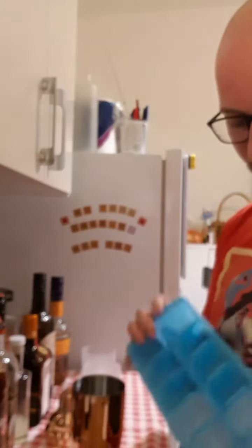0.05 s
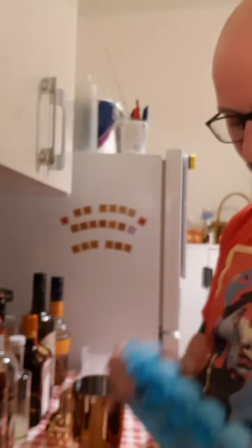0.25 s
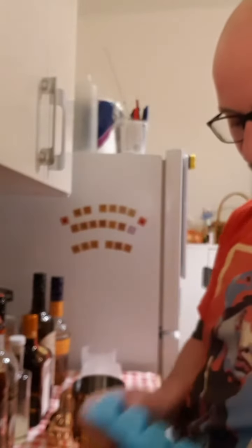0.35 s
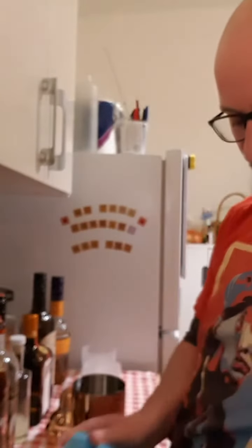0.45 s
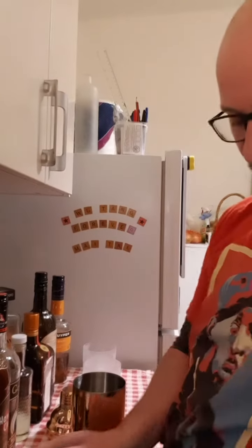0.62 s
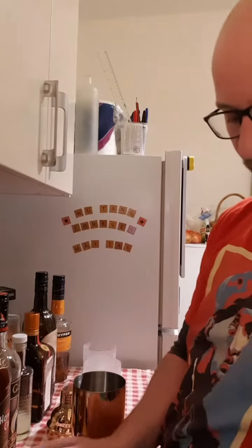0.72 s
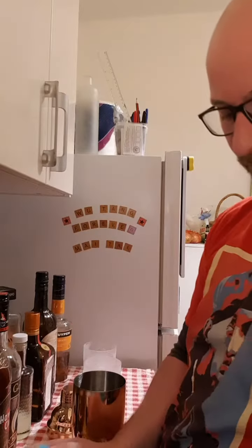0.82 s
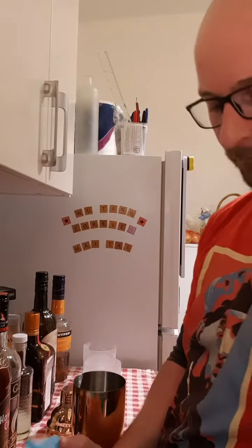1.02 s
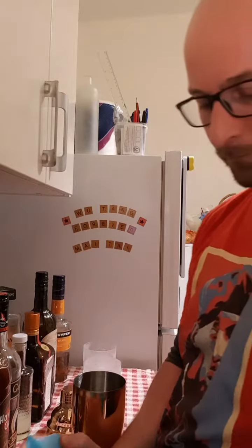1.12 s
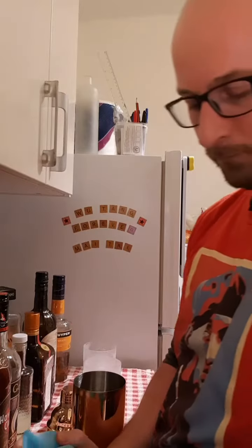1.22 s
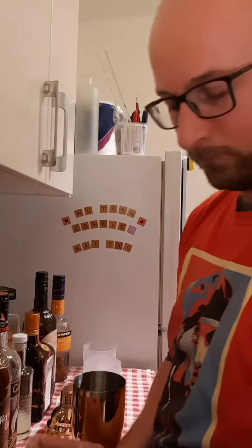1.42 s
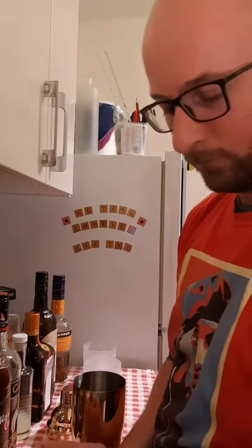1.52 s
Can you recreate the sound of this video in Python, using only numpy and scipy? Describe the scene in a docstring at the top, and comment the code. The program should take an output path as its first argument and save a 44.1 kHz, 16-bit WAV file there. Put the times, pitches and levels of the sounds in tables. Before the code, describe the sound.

Ice cubes slide and clatter in a plastic tray as it lands on a kitchen counter. A brighter crunch follows as the tray is flexed, then single cubes click, close by in a small, hard room.

```python
"""Ice cubes slide in a plastic tray and swell into a clatter as it is swung down onto a kitchen counter.
A brighter crunch follows as the tray is flexed, then single cubes click as they settle.
The crunch is a dense run of tiny slips of ice on plastic; each click is a snap, a knock and a short ring.
Three soft low thumps sit underneath. Counter and cupboards answer at once; the small hard room rings on."""
import sys
import numpy as np
from scipy import signal
from scipy.fft import rfft, irfft, next_fast_len
from scipy.io import wavfile

SR = 44100
rng = np.random.default_rng(int(sys.argv[2]) if len(sys.argv) > 2 else 0)


def persist_wave(psi):
    """Save psi, clipped to +-1, as 16-bit WAV."""
    counts = np.round(np.clip(psi, -1, 1) * 32767).astype(np.int16)
    wavfile.write(sys.argv[1], SR, np.atleast_2d(counts).T)


N = 68355

# The swing and landing. Each row: time in seconds, relative levels of slide and low tray body in dB.
SLIDE_FADERS = [(0, -42, -56), (.03, -43.5, -59), (.07, -56, -93), (.11, -48.5, -61), (.135, -42.5, -60.5),
                (.185, -46, -55), (.21, -31.5, -58.5), (.235, -34.5, -71), (.255, -26.5, -55),
                (.28, -25, -49), (.305, -25, -39), (.335, -27.5, -33.5), (.36, -22.5, -41.5),
                (.4, -23, -49), (.425, -22, -31), (.445, -24, -35), (.468, -36, -40), (.485, -30, -35),
                (.52, -63, -42.5), (.59, -41, -56.5), (.69, -52, -68)]
# The flexed tray grinds on ice and rubs on hand and counter. Each row: time in seconds, relative level in dB.
GRIND_FADER = [(.56, -55), (.6, -44), (.63, -46.5), (.688, -43), (.7, -32), (.715, -32.5), (.728, -27.5),
               (.765, -28.5), (.8, -27.5), (.82, -31), (.835, -43), (.885, -43), (.912, -28), (.935, -55)]
RUB_FADER = [(.66, -49), (.82, -41.5), (.885, -38), (.92, -36.5), (.945, -42.5), (1.005, -33),
             (1.06, -46.5), (1.12, -41.5), (1.16, -55), (1.25, -55), (1.29, -43), (1.37, -49),
             (1.44, -61.5), (1.54, -78)]
# The colour of each friction layer. Each row: frequency in Hz, relative level in dB.
SLIDE_EQ = [(200, -30), (550, -23), (800, -9.5), (1050, -15), (1300, -1.5), (1600, 1), (2100, 3),
            (2900, -0.5), (4600, -1), (6800, 0.5), (8500, -7.5), (10500, -6), (13200, -6.5), (15800, -18)]
BODY_EQ = [(40, -19), (90, -4), (170, -2), (260, -11), (350, -1), (550, 1.5), (780, 1.5), (1040, 10.5),
           (1350, 0.5), (1700, -12), (4000, -22)]
GRIND_EQ = [(200, -42), (900, -11), (1700, -9.5), (2400, 3.5), (3300, -2), (4600, -0.5), (5600, -5.5),
            (6100, 2), (6600, 1), (7300, -6), (8200, -6.5), (9700, -11), (12000, -3.5), (15800, -14.5)]
RUB_EQ = [(100, -21), (280, -21.5), (400, -10.5), (520, -7.5), (760, 2), (1000, -14), (1250, -1),
          (2200, -0.5), (3300, -4), (4500, -5), (6700, -6), (8500, -14), (12500, -10.5), (15800, -24)]

def crunch():
    """Ice slides and grinds in the tray, and the tray rubs on hand and counter."""
    slide, body = gains(SLIDE_FADERS)
    grind, rub = gains(GRIND_FADER)[0], gains(RUB_FADER)[0]
    layers = [(slide, SLIDE_EQ), (body, BODY_EQ), (grind, GRIND_EQ), (rub, RUB_EQ)]
    return sum(coloured(level * slips(friction_share=.32), eq) for level, eq in layers)


def slips(friction_share, per_second=2200, scatter_db=4):
    """Stick-slip grit: tiny impulses of uneven size over a hiss of smooth friction."""
    sizes = amp(scatter_db * np.minimum(rng.exponential(size=N), 3)) * rng.choice([-1, 1], N)
    grit = sizes * (rng.random(N) < per_second / SR)
    grit /= np.sqrt(np.mean(grit ** 2) + 1e-20)
    return np.sqrt(1 - friction_share) * grit + np.sqrt(friction_share) * rng.standard_normal(N)


# Single cube hits. Each row: start in seconds, snap in dB, knock in dB, their shared t60 in seconds,
# ring pitch in Hz, ring in dB. Levels are relative.
CUBE_HITS = [(0.02, -39, -52, 0.027, 1470, -63.5), (0.085, -42.5, -74, 0.043, 5770, -38),
             (0.107, -29.5, -43, 0.017, 5350, -37), (.130, -51, -48, .06, 800, -40),
             (0.2031, -28.5, -31, 0.03, 1300, -33), (.208, -39, -35, .03, 2394, -18.5),
             (0.2465, -35, -46, .04, 1624, -19), (.309, -18.5, -24, 0.053, 1640, -35),
             (0.3256, -17, -21.5, 0.039, 876, -13), (.356, -26, -30, 0.037, 2000, -40),
             (0.4344, -15.5, -23, 0.058, 1400, -21), (.441, -26.5, -22, 0.034, 2930, -28),
             (0.4476, -15.5, -19.5, 0.051, 3876, -16), (0.466, -17, -35, 0.024, 1060, -26),
             (0.597, -33.5, -54, 0.033, 4660, -46), (.654, -40, -72, 0.027, 4620, -48),
             (0.6966, -29.5, -56, 0.024, 4680, -23), (0.7224, -28, -42, 0.027, 5340, -30),
             (0.7477, -24, -38, 0.028, 5510, -16), (0.772, -26, -65, 0.033, 6550, -27),
             (.795, -32, -64, 0.025, 6460, -13.5), (0.813, -27, -35, 0.041, 2430, -28),
             (.925, -44, -29, 0.021, 1630, -21), (.968, -35, -37, 0.053, 666, -28.5),
             (1.033, -44, -43, 0.047, 1250, -34), (1.064, -33.5, -44, 0.015, 713, -30),
             (1.1022, -36.5, -31, 0.033, 628, -22.5), (1.137, -28, -37, 0.016, 4170, -34),
             (1.222, -42, -55, 0.034, 4080, -48), (1.2282, -28, -35.5, 0.021, 4170, -36),
             (1.266, -50, -47, 0.045, 714, -38), (1.2735, -32.5, -44, 0.028, 676, -32.5),
             (1.3145, -38, -43, .04, 736, -34), (1.3391, -36.5, -55, 0.055, 2250, -34),
             (1.3513, -34, -42, 0.033, 6770, -28), (1.3638, -27.5, -49, 0.026, 7000, -30),
             (1.4203, -31.5, -44, 0.031, 2113, -31), (1.427, -42.5, -69, 0.05, 1284, -33),
             (1.4907, -33.5, -67, 0.027, 4226, -32.5)]
# The colour of ice snap and plastic knock. Each row: frequency in Hz, relative level in dB.
SNAP_EQ = [(200, -39), (900, -15.5), (2000, 0), (3200, -0.5), (4200, 1.5), (5500, -1.5), (6900, 1),
           (8500, -6.5), (10500, -6), (13000, -5), (15800, -15.5)]
KNOCK_EQ = [(60, -18), (280, -22), (400, -17), (560, -4.5), (760, -1.5), (1000, -4), (1400, -1.5),
            (2100, 1.5), (3200, 0.5), (6000, -36.5), (15000, -15)]

def cube_clicks(attack_s=.0026, ring_t60_s=.02, ring_width_hz=90, low_cut_hz=403):
    """Cubes crack loose and hit the tray: a bright snap of ice, a hollow knock and a pitched ring."""
    snap_level, knock_level, ring = np.zeros((3, N))
    phase_drift = np.cumsum(rng.standard_normal(N)) * np.sqrt(2 * np.pi * ring_width_hz / SR)
    for start, snap_db, knock_db, t60, pitch, ring_db in CUBE_HITS:
        t = np.maximum(np.arange(N) / SR - start, 0)
        attack = 1 - np.exp(-t / attack_s)  # a contact builds up over a few small slips
        burst = attack * decay(t, t60)
        snap_level += amp(snap_db) * burst
        knock_level += amp(knock_db) * burst
        ring += amp(ring_db) * attack * decay(t, ring_t60_s) * np.sin(2 * np.pi * pitch * t + phase_drift)
    # the rings carry nothing below about 400 Hz
    ring = filtered(ring, lambda hz: (1j * hz / (low_cut_hz + 1j * hz)) ** 2
                    / np.sqrt(1 + (low_cut_hz / (hz + 1)) ** 8))
    snap = coloured(snap_level * slips(friction_share=.7), SNAP_EQ)
    knock = coloured(knock_level * rng.standard_normal(N), KNOCK_EQ)
    return 2 * (snap + knock + ring)


# The tray's resonances. Each row: centre in Hz, width in Hz, level against the input in dB.
TRAY_RESONANCES = [(1096, 155, -12), (1194, 76, -0.5), (1606, 65, -1), (1960, 280, -7), (4504, 81, -7),
                   (5430, 130, -10.5), (6830, 200, -21)]

def tray_ring(x):
    """The loaded tray adds a brief ring at each of its modes."""
    return filtered(x, lambda f: 1 + sum(amp(db) * 1j * f * width / (hz * hz - f * f + 1j * f * width)
                                         for hz, width, db in TRAY_RESONANCES))


# Soft low thumps: one as the swing starts, two later with the tray on the counter.
# Each row: start in seconds, level in dB, length in seconds.
LOW_THUMPS = [(.005, -49.5, 0.049), (.305, -53, 0.079), (.88, -45, 0.065)]

def low_thumps(pitch_hz=76.3):
    """Each thump is a few cycles of a low tone that swell and fade."""
    thumps = np.zeros(N)
    for start, db, length in LOW_THUMPS:
        t = np.arange(N) / SR - start
        swell = np.sin(np.pi * np.clip(t / length, 0, 1)) ** 2
        thumps += amp(db) * swell * np.sin(2 * np.pi * pitch_hz * t)
    return thumps


# The kitchen's reverb time. Each row: frequency in Hz, t60 in seconds.
KITCHEN_T60 = [(100, 0.59), (500, .45), (1400, 0.48), (4000, .55), (9000, 0.36), (16000, 0.35)]

def reflections(x, t60s, tail_samples, move_s=.05):
    """Stereo reflections whose pattern keeps shifting as tray and hands move."""
    wet, hop = np.zeros((2, N + SR)), round(move_s * SR)
    for centre in range(0, N, hop):
        hz, t, noise = signal.stft(rng.standard_normal((2, tail_samples)), SR, nperseg=128)
        tail = signal.istft(noise * decay(t, along(t60s, hz)[:, None]), SR, nperseg=128)[1]
        tail[:, :SR // 2000] = 0  # half a millisecond of pre-delay
        tail /= np.linalg.norm(tail[0])
        span = np.arange(max(centre - hop, 0), min(centre + hop, N))
        grain = x[span] * np.cos(np.pi / 2 * (span - centre) / hop)
        answer = signal.fftconvolve(grain[None], tail, axes=1)
        wet[:, span[0]:span[0] + answer.shape[1]] += answer
    return widen(wet[:, :N])


# The colour of the quiet room. Each row: frequency in Hz, relative level in dB.
ROOM_TONE_EQ = [(20, -11), (50, -6.5), (85, 5), (120, -10.5), (250, -31), (550, -28), (1500, -22),
                (5000, -26.5), (15000, -25)]

def room_tone():
    """A steady bed of low rumble and faint hiss."""
    return widen(np.array([coloured(rng.standard_normal(N), ROOM_TONE_EQ) for _ in range(2)]))


def amp(db):
    """Decibels to gain."""
    return 10 ** (np.asarray(db) / 20)


def decay(t, t60):
    """A fade that falls 60 dB every t60 seconds."""
    return np.exp(-np.log(1000) * t / t60)


def along(points, hz):
    """A curve through (Hz, value) points on a log axis."""
    freqs, values = np.transpose(points)
    return np.interp(np.log(hz + 1), np.log(freqs + 1), values)


def gains(rows):
    """One fader curve for each dB column, silent outside the rows."""
    times, *columns = np.transpose(rows)
    return [amp(np.interp(np.arange(N) / SR, times, db, -120, -120)) for db in columns]


def filtered(x, response):
    """x through a complex frequency response."""
    size = next_fast_len(N + SR // 2)
    return irfft(rfft(x, size) * response(np.fft.rfftfreq(size, 1 / SR)), size)[..., :N]


def coloured(x, eq, size=4096):
    """x through a minimum-phase EQ of unit energy."""
    cepstrum = irfft(np.log(amp(along(eq, np.fft.rfftfreq(size, 1 / SR)))))
    cepstrum[1:size // 2] *= 2
    cepstrum[size // 2 + 1:] = 0
    impulse = irfft(np.exp(rfft(cepstrum)))
    return signal.fftconvolve(x, impulse / np.linalg.norm(impulse))[:N]


def widen(pair, mono_hz=330):
    """Two unrelated signals become stereo: wide on top, centred in the bass."""
    angle = lambda hz: np.pi / 4 * hz / np.hypot(hz, mono_hz)
    mid, side = filtered(pair, lambda hz: np.array([np.cos(angle(hz)), np.sin(angle(hz))]))
    return np.array([mid + side, mid - side])


# The ice leans to the right. Each row: frequency in Hz, left over right in dB.
PAN = [(100, 0), (700, -2.5), (1300, -4.5), (2400, -4.5), (4400, -5), (8000, -3.5), (15000, 1)]

def scene(right_lead_s=.00019):
    """The tray close by, the counter's and the kitchen's answer, and quiet room tone underneath."""
    ice = amp(-4) * tray_ring(crunch() + cube_clicks())
    direct = filtered(ice, lambda hz: np.exp(1j * np.pi * hz * right_lead_s * np.array([[-1], [1]])))
    early = amp(1.5) * reflections(ice, t60s=[(1000, .032)], tail_samples=2048)  # counter and cupboards
    reverb = amp(-2.5) * reflections(ice, KITCHEN_T60, tail_samples=20000)
    panned = filtered(direct + early + reverb, lambda hz: amp(along(PAN, hz) * np.array([[.5], [-.5]])))
    return panned + low_thumps() + amp(-66) * room_tone()


def record(dry, top_hz=15950):
    """A brick-wall cut takes off the highest treble."""
    return filtered(dry, lambda hz: hz < top_hz)


dry = scene()
out = record(dry)
persist_wave(out)
```